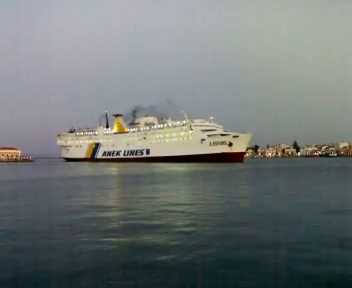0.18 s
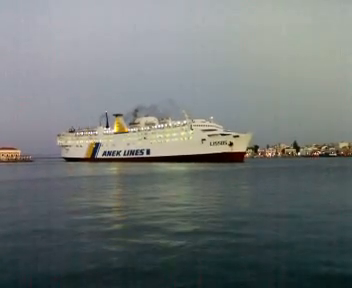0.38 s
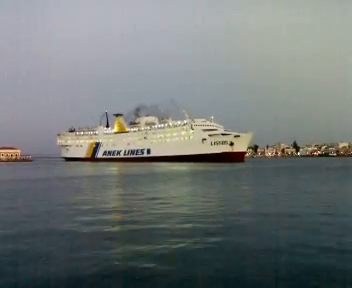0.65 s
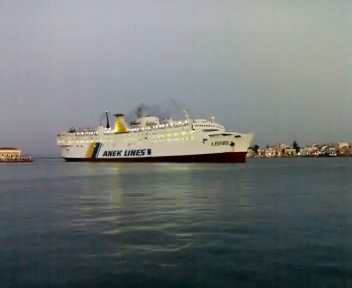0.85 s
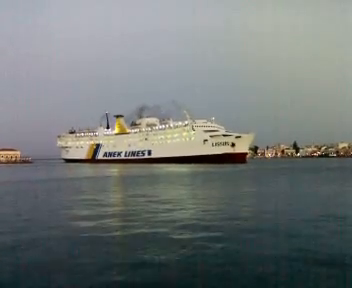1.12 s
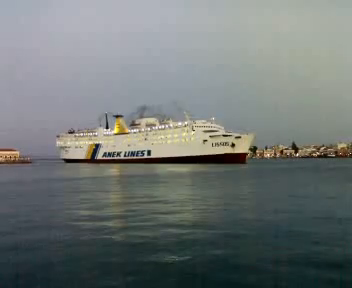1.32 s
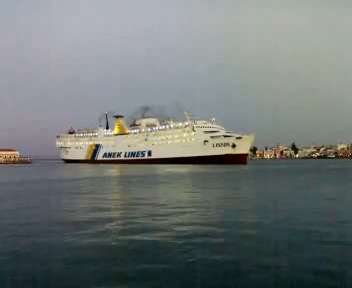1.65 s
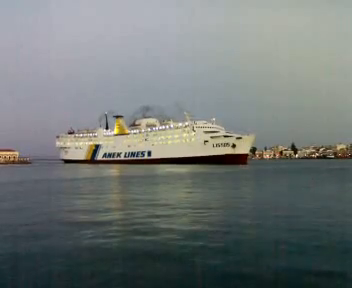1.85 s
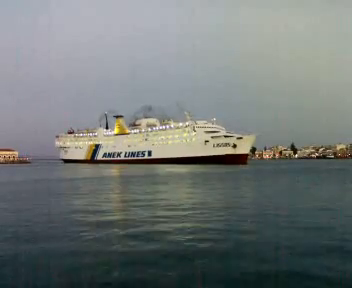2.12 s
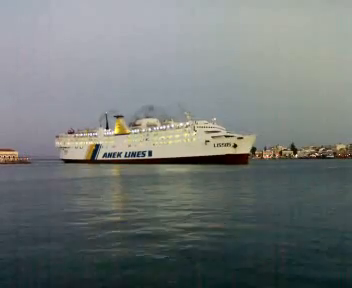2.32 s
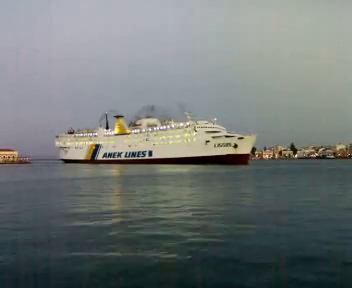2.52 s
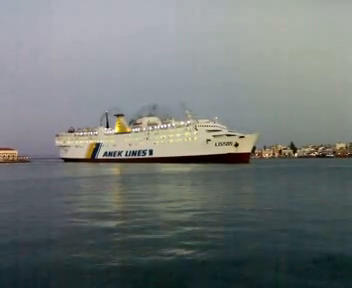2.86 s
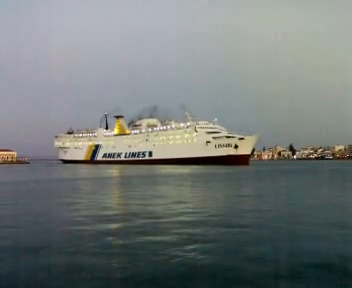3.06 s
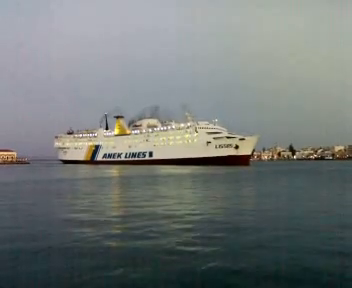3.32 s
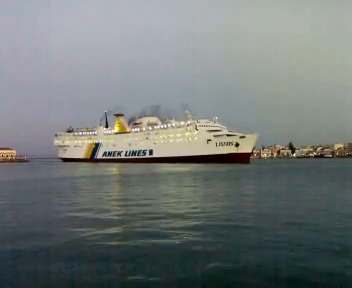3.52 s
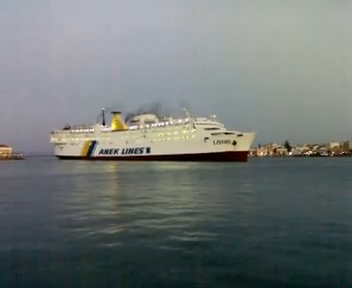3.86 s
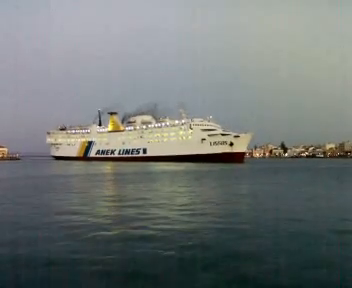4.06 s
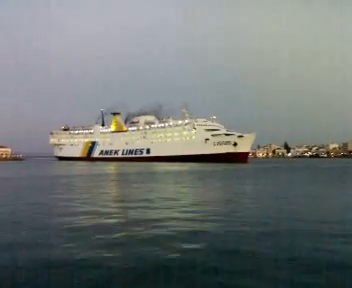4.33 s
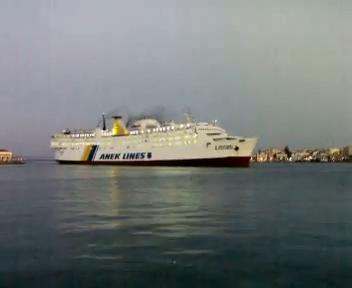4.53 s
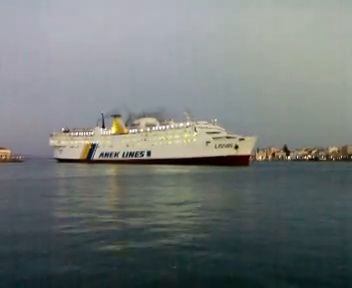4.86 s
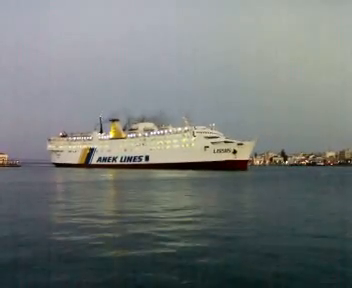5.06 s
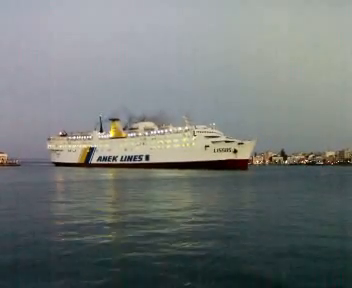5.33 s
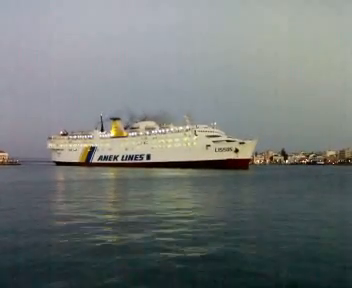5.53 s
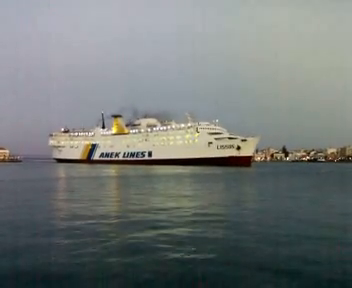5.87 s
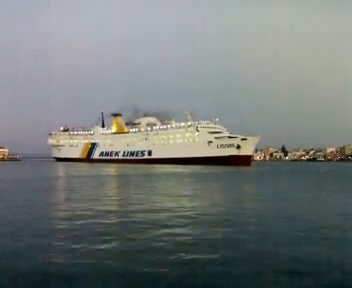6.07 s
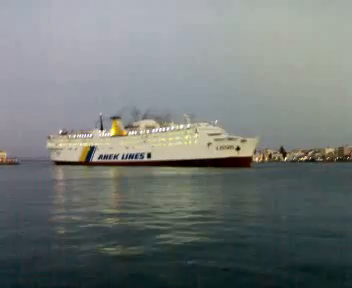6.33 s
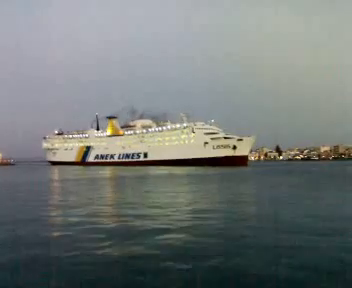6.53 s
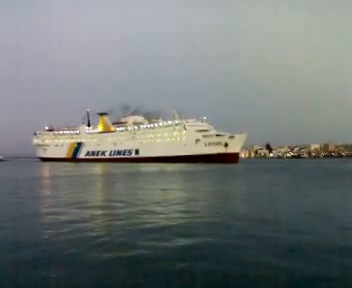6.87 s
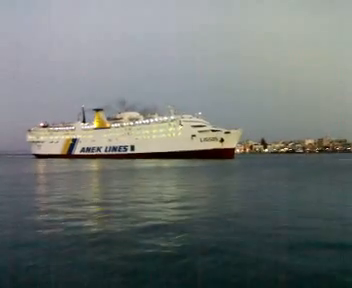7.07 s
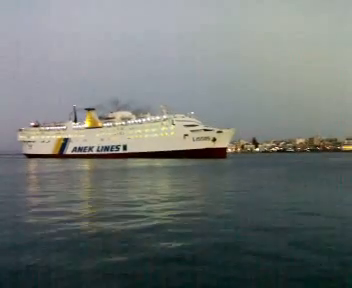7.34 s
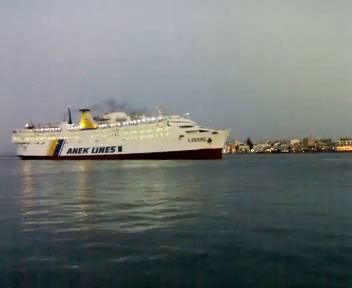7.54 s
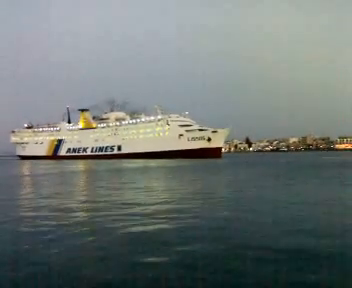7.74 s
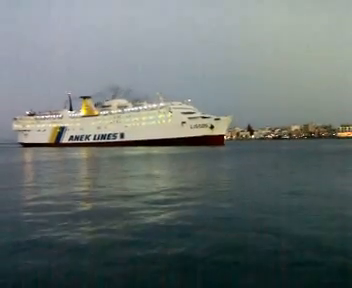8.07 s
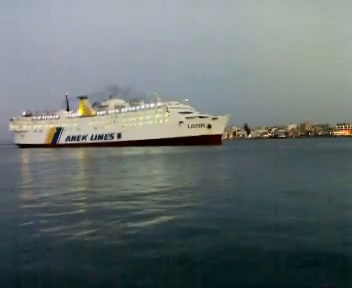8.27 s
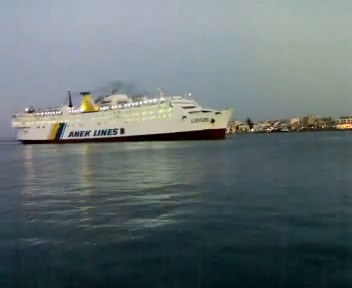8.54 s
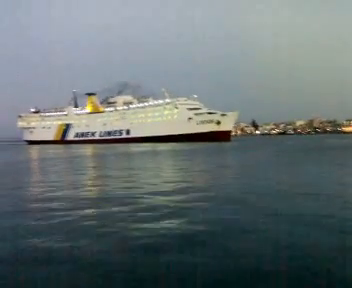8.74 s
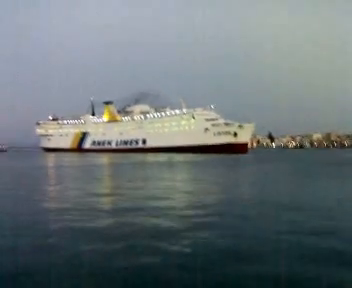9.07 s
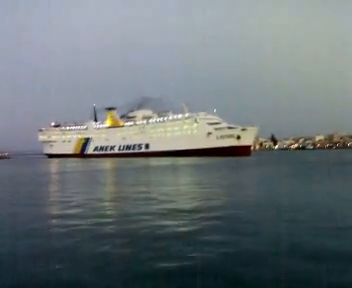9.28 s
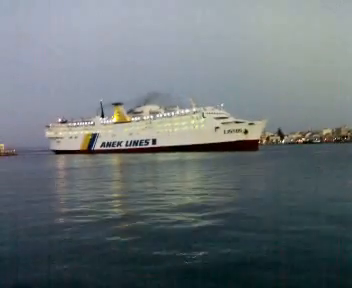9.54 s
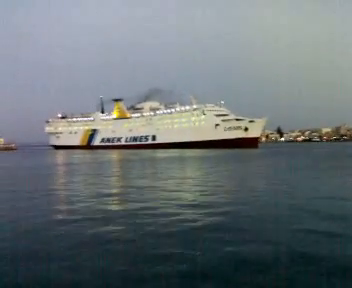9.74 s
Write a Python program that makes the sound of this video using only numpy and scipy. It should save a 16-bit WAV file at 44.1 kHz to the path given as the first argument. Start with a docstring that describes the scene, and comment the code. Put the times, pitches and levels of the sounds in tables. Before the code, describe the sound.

Steady ship engine rumble and ventilation roar across the water, with a swelling thruster whine, churning wash and light wind on the microphone.

```python
"""A large ferry's main diesel drones as it manoeuvres in a harbour, heard from the quay on a small camera.
Two generators throb, a blower hums and fans roar over the exhaust. As the propellers take load
the water hisses, a thruster whines in two pushes and turbochargers whistle.
Small birds chirp briefly, a breeze buffets the microphone, and there are a few close ticks and knocks;
the camera's electronics whine faintly."""
import sys
import numpy as np
from scipy import signal
from scipy.fft import rfft, irfft
from scipy.io import wavfile
from scipy.ndimage import map_coordinates

SR = 44100
rng = np.random.default_rng(int(sys.argv[2]) if len(sys.argv) > 2 else 0)


def persist_wave(psi):
    """Save psi, clipped to +-1, as 16-bit WAV."""
    counts = np.round(np.clip(psi, -1, 1) * 32767).astype(np.int16)
    wavfile.write(sys.argv[1], SR, np.atleast_2d(counts).T)


N = 436590
TIME = np.arange(N) / SR
FREQ = np.maximum(np.arange(N // 2 + 1) * SR / N, 1)

# diesel exhaust spectrum (frequency [Hz], relative level [dB])
EXHAUST_SPECTRUM = [(12, -22), (25, -8.5), (42, -7), (62, -6.5), (88, -10), (120, -1.8), (150, -0.8),
                    (215, -1), (280, -6.3), (380, -9.5), (480, -12.5), (600, -21.5), (1000, -37.5)]
# thruster pushes (time [s], length [s], gear level [dB])
PUSHES = [(3.06, 0.7, -39.7), (4.05, 0.9, -38)]


def undb(db):
    """Decibels to gain."""
    return 10 ** (np.asarray(db) / 20)


def unit(x):
    """Scale to rms 1."""
    return x / np.sqrt(np.mean(x ** 2))


def noise():
    """White noise."""
    return rng.standard_normal(N)


def walk(rate_hz):
    """Smooth random drift, spread about 1."""
    points = rng.standard_normal(2048)
    return map_coordinates(points, [TIME[::32] * rate_hz], order=3, mode="wrap").repeat(32)[:N]


def add(out, start_s, sound):
    """Mix in a short sound."""
    i = int(start_s * SR)
    out[i:i + len(sound)] += sound[:max(N - i, 0)]


def curve(table, column):
    """Column of a timed table, linearly interpolated."""
    rows = np.array(table)
    return np.interp(TIME, rows[:, 0], rows[:, column])


def plateau(full_s, off_s, rise_db_per_s, fall_db_per_s):
    """Attack, hold and release in dB; 0 during the hold."""
    return -rise_db_per_s * np.maximum(full_s - TIME, 0) - fall_db_per_s * np.maximum(TIME - off_s, 0)


def swell(at_s, length_s):
    """Gaussian bell of gain, peak 1."""
    return np.exp(-(2 * (TIME - at_s) / length_s) ** 2)


def power_sum(*gains):
    """Joint gain of uncorrelated parts."""
    return np.sqrt(sum(gain ** 2 for gain in gains))


def colour(x, spectrum):
    """Filter by (Hz, dB) points, rolling off beyond both ends; rms 1."""
    hz, db = np.transpose(spectrum)
    rolloff = np.minimum(FREQ / hz[0], 1) ** 2 * np.minimum(hz[-1] / FREQ, 1) ** 2
    gain = undb(np.interp(np.log(FREQ), np.log(hz), db))
    return unit(irfft(rfft(x) * rolloff * gain, N))


def ring(x, hz, width_hz):
    """Resonance applied twice for steep skirts; rms 1."""
    detuning = (FREQ / hz - hz / FREQ) * hz / width_hz / np.sqrt(2)
    return unit(irfft(rfft(x) / (1 + 1j * detuning) ** 2, N))


def rush(at_s, length_s, hz, width_hz, db):
    """Band of turbulence that swells and fades once."""
    return undb(db) * ring(noise(), hz, width_hz) * swell(at_s, length_s)


def tone(hz, partials):
    """Partials (ratio, width [Hz], level [dB], steady share), each part steady, part turbulent."""
    phase = 2 * np.pi * np.cumsum(hz * np.ones(N)) / SR
    out = 0
    for ratio, width_hz, db, steady in partials:
        smear = walk(width_hz) + 1j * walk(width_hz)
        amplitude = np.sqrt(2 * steady) + np.sqrt(1 - steady) * smear
        out += undb(db) * np.real(amplitude * np.exp(1j * ratio * phase))
    return out


def drone(hz, orders, wander=.0006, fade_db=1.1, fade_hz=1.6):
    """Machine lines (order, level [dB]) fading on their paths over the water; returns sound, phase."""
    phase = 2 * np.pi * np.cumsum(hz * (1 + wander * walk(1.998))) / SR
    out = 0
    for order, db in orders:
        gain = undb(db + fade_db * walk(fade_hz))
        out += gain * np.sin(order * phase + 2 * np.pi * rng.random())
    return np.sqrt(2) * out, phase


def electronics():
    """Faint steady whine of the camera."""
    # (frequency [Hz], rms level [dB])
    lines = [(4980.5, -67.5), (5273.4, -73), (5566.4, -68), (5859.4, -68), (6152.4, -70.5)]
    return np.sqrt(2) * sum(undb(db) * np.sin(2 * np.pi * hz * TIME) for hz, db in lines)


def ticks(decay_s=0.0022):
    """Dry ticks, as of fingers on the camera's case."""
    # (time [s], centre [Hz], width [Hz], onset level [dB])
    taps = [(1.795, 6500, 2000, -43), (5.474, 5900, 1200, -45), (8.761, 3400, 1500, -41),
            (8.813, 4100, 900, -46), (8.885, 6700, 1200, -44), (8.9015, 2500, 2200, -28.5),
            (8.922, 3900, 2000, -40.5), (9.087, 3900, 1200, -44), (9.132, 6400, 1500, -44),
            (9.137, 6300, 1500, -49)]
    out, t = np.zeros(N), TIME[:SR // 20]
    for at_s, hz, width_hz, db in taps:
        band = signal.butter(2, [hz - width_hz / 2, hz + width_hz / 2], "band", fs=SR, output="sos")
        burst = unit(signal.sosfilt(band, rng.standard_normal(len(t))))
        add(out, at_s, undb(db) * burst * np.exp(-t / decay_s))
    return out


def knocks():
    """Soft thumps on the microphone, one to a few cycles each."""
    # (time [s], frequency [Hz], length [s], envelope peak [dB])
    thumps = [(8.296, 95, .011, -12.5), (8.306, 260, .011, -15), (8.5967, 470, .002, -7.5),
              (8.607, 155, .03, -17)]
    return -sum(undb(db) * np.sin(2 * np.pi * hz * (TIME - at_s)) * swell(at_s, length_s)
                for at_s, hz, length_s, db in thumps)


def breeze(lull_db=-34, gust_db=-32):
    """Low turbulence at the microphone: a lull, one long gust, a few stronger eddies."""
    # eddies (time [s], length [s], centre [Hz], level [dB])
    buffets = [(6.984, 0.06, 90, -22), (7.103, 0.05, 95, -22), (7.487, 0.13, 105, -27),
               (8.138, 0.15, 80, -24), (8.35, 0.04, 188, -27), (8.778, 0.085, 90, -25)]
    gust = undb(gust_db + plateau(full_s=6, off_s=8.6, rise_db_per_s=9.5, fall_db_per_s=9.5))
    rumble = colour(noise(), [(8, -12), (32, -3), (55, 0.5), (100, -1), (200, -19)])
    rumble *= power_sum(undb(lull_db), gust) * undb(0.6 * walk(11))
    return rumble + sum(rush(at_s, length_s, hz, hz, db) for at_s, length_s, hz, db in buffets)


def birds(rasp=0.002):
    """Thin gliding chirps with a slight rasp."""
    # (time [s], length [s], start [Hz], middle [Hz], end [Hz], level [dB])
    chirps = [(5.61, .08, 5880, 6020, 6080, -57), (5.68, .1, 6180, 6200, 6250, -62),
              (6.18, .16, 5820, 6030, 5700, -56), (6.33, .09, 6080, 6070, 6140, -55),
              (6.39, .12, 5400, 5740, 5740, -60), (6.775, .05, 5300, 5750, 6080, -57),
              (6.8, .09, 6300, 6390, 6370, -60), (6.85, .11, 6050, 6100, 6160, -56),
              (6.96, .14, 4160, 4200, 4160, -53), (7.1, .08, 5600, 5800, 5820, -62.5),
              (7.16, .13, 4220, 4200, 4170, -60)]
    out, waver = np.zeros(N), 1 + rasp * walk(210)
    for at_s, length_s, first_hz, middle_hz, last_hz, db in chirps:
        progress = np.linspace(0, 1, int(length_s * SR))
        arch = np.polyfit([0, .5, 1], [first_hz, middle_hz, last_hz], 2)
        hz = np.polyval(arch, progress) * waver[int(at_s * SR):][:len(progress)]
        envelope = undb(db) * np.sqrt(2) * np.sin(np.pi * progress)
        add(out, at_s, envelope * np.sin(2 * np.pi * np.cumsum(hz) / SR))
    return out


def fans(level_db=-35, growth_db=5, turn_s=(7.4, 9.55)):
    """Engine-room ventilation: the roar grows and changes colour as the ship turns."""
    # spectra before and after the turn (frequency [Hz], relative level [dB])
    spectrum_before = [(270, -6.5), (328, 6.5), (410, -8), (610, -5.5), (730, 1), (900, -0.5), (1200, -1),
                       (1380, 1), (1560, -2.5), (1800, -4.5), (2050, -3.5), (2500, -12), (3000, -21),
                       (3600, -32.5), (4700, -27), (5400, -34), (7000, -43)]
    spectrum_after = [(250, 5), (340, 9), (420, -3), (490, -2), (580, -5.5), (730, -1), (1200, -1),
                      (1560, 2.5), (1800, -2.5), (2100, -8.5), (2500, -11), (3000, -17.5), (3600, -26),
                      (4700, -30.5), (5400, -34), (7000, -39)]
    turned = np.interp(TIME, turn_s, [0, 1])
    before = colour(noise(), spectrum_before) * undb(level_db) * np.sqrt(1 - turned)
    after = colour(noise(), spectrum_after) * undb(level_db + growth_db) * np.sqrt(turned)
    return (before + after) * undb(0.26 * walk(14))


def auxiliaries(blade_hz=163.05):
    """A blower's blade tone and octave fade in and out over the hum of smaller machines."""
    # (time [s], blade tone [dB], octave [dB])
    blower_levels = [(0, -34.5, -49), (1.05, -32.5, -48), (1.8, -43, -44), (4.7, -43, -43), (5.6, -45, -49),
                     (7.4, -46, -50), (8.7, -44, -41), (9.9, -38, -44)]
    # (frequency [Hz], start level [dB], end level [dB])
    hums = [(148.3, -42, -42), (296.6, -52, -52)]
    blower, _ = drone(blade_hz, [(1, curve(blower_levels, 1)), (2, curve(blower_levels, 2))])
    return blower + sum(drone(hz, [(1, np.linspace(start_db, end_db, N))])[0]
                        for hz, start_db, end_db in hums)


def water(load_db, wash_db=-32.5, spray_db=-43, burst_db=-42, wash_share=0.82, over_gear_db=4):
    """Propeller wash with finer spray above; both follow the load and surge with the thruster."""
    # spectra (frequency [Hz], relative level [dB])
    wash_spectrum = [(300, -15.5), (480, -4.5), (590, -3), (700, 4.5), (850, 1.5), (1050, 0), (1230, -6),
                     (1360, 0.5), (1560, 1), (1780, 0.5), (2100, -6.5), (2450, -12.5), (3700, -24.5),
                     (7000, -45)]
    spray_spectrum = [(1000, -6), (2000, 2.5), (2500, 2), (3000, -2), (3400, -7.5), (4100, -10),
                      (4800, -10), (5300, -17.5), (5700, -14.5), (6200, -13), (7000, -13.5), (7500, -30)]
    # water boiling up (time [s], length [s], centre [Hz], width [Hz], level [dB])
    surges = [(1.57, 0.25, 1930, 600, -41), (2.05, 1, 1660, 883, -41), (2.73, 0.17, 4160, 700, -52.5),
              (3.17, 0.94, 1530, 896, -36), (3.24, 0.5, 6330, 2630, -54), (4.32, 0.52, 1460, 860, -36)]
    pushes = [undb(db + over_gear_db) * swell(at_s, length_s) for at_s, length_s, db in PUSHES]
    # one burst of spray as the thruster bites
    burst = undb(burst_db + plateau(full_s=2.66, off_s=2.66, rise_db_per_s=71, fall_db_per_s=6.5))
    wash = colour(noise() * undb(walk(150)), wash_spectrum) * undb(0.29 * walk(9))
    wash *= power_sum(undb(wash_db + wash_share * load_db), *pushes)
    spray = colour(noise() * undb(1.2 * walk(190)), spray_spectrum) * undb(0.95 * walk(12))
    spray *= power_sum(undb(spray_db + load_db), burst)
    return wash + spray + sum(rush(*surge) for surge in surges)


def turbochargers(full_s=4.2, flare_width_hz=25, flare_steady=.7):
    """Thin whistles follow the boost, creep up in pitch and each swell once; two more flare briefly."""
    # (pitch at full_s [Hz], climb [Hz/s], width [Hz], level [dB], steady share [0-1],
    #  swell time [s], swell length [s], swell level [dB])
    whistles = [(2194, 3, 25, -48.5, .8, 5.98, .75, -43), (3000, 12, 70, -55, .25, 5.95, .4, -57),
                (4520, 8, 40, -67.5, .8, 5.77, .45, -56)]
    # (time [s], length [s], pitch [Hz], level [dB])
    flares = [(3.17, .2, 1358, -36), (6.62, .36, 2224, -43)]
    boost = undb(plateau(full_s, off_s=6.65, rise_db_per_s=7.5, fall_db_per_s=38.5))
    out = sum(tone(hz, [(1, flare_width_hz, db, flare_steady)]) * swell(at_s, length_s)
              for at_s, length_s, hz, db in flares)
    for hz, climb_hz_per_s, width_hz, db, steady, at_s, length_s, swell_db in whistles:
        gain = power_sum(undb(db) * boost, undb(swell_db) * swell(at_s, length_s))
        out += gain * tone(hz + climb_hz_per_s * (TIME - full_s), [(1, width_hz, 0, steady)])
    return out


def thruster(load_db, gear_hz=442, gear_db=-50, howl_hz=683, howl_db=-37.3):
    """The gear spins up, whining faintly under load and loudly at each push; the tunnel howls."""
    # gear and tunnel partials (pitch ratio, width [Hz], relative level [dB], steady share [0-1])
    gear_partials = [(.5, 8, -1, .8), (1, 12, 0, .88), (1.76, 25, -8, .4), (2, 40, -7, .3),
                     (2.19, 30, -4, .4), (2.58, 30, -5, .45), (2.97, 45, -4, .35), (3.9, 120, -6, 0)]
    howl_partials = [(.97, 22, -6, .4), (1, 24, 0, .62), (1.03, 30, -6.5, .25)]
    spun_up_s, climb_hz_per_s, howl_waver = 3.8, 6, .007
    howl = tone(howl_hz * (1 + howl_waver * walk(4)), howl_partials)
    howl *= undb(howl_db + plateau(full_s=2.97, off_s=4.05, rise_db_per_s=35, fall_db_per_s=14))
    gear = tone(gear_hz - climb_hz_per_s * np.maximum(spun_up_s - TIME, 0), gear_partials)
    pushes = [undb(db) * swell(at_s, length_s) for at_s, length_s, db in PUSHES]
    return howl + gear * power_sum(undb(gear_db + load_db), *pushes)


def generator(cycle_hz, orders, comb_db, wander=.0005):
    """Unequal cylinders repeat a pattern each working cycle: a throbbing comb, a few lines strong."""
    size = 4096  # samples per cycle
    multiples = np.arange(size // 2 + 1)
    hz, db = np.transpose(EXHAUST_SPECTRUM)
    lines_db = comb_db + np.interp(multiples * cycle_hz, hz, db, left=-np.inf, right=-np.inf)
    phases = np.exp(2j * np.pi * rng.random(len(multiples)))
    crank = np.cumsum(cycle_hz * (1 + wander * walk(2))) / SR % 1 * size
    strong, start_db, end_db = np.transpose(orders)
    sounds = []
    for strong_db in (start_db, end_db):
        lines_db[strong.astype(int)] = strong_db
        cycle = irfft(undb(lines_db) * phases) * size / np.sqrt(2)
        sounds.append(np.interp(crank, np.arange(size + 1), np.append(cycle, cycle[0])))
    start, end = sounds
    return start + (end - start) * TIME / TIME[-1]


def generators():
    """Two governed four-strokes beat against each other; their lines shift in level as the ship turns."""
    # strong exhaust lines (multiple of the cycle rate, start level [dB], end level [dB])
    first_orders = [(8, -47, -45), (10, -42, -39), (16, -48, -45), (17, -43, -38), (23, -48, -44),
                    (24, -48, -41), (26, -45, -43), (28, -48, -48), (33, -47, -45), (36, -47, -50),
                    (44, -50, -46), (59, -55, -48)]
    second_orders = [(5, -46, -45), (12, -38, -37), (18, -46, -47), (35, -47, -50), (37, -50, -51),
                     (49, -52, -50)]
    first = generator(cycle_hz=6.038, orders=first_orders, comb_db=-51)
    second = generator(cycle_hz=6.238, orders=second_orders, comb_db=-54)
    return first + second


def main_diesel(load_db, octave_cap_db=-39.5, gas_db=-29.3, puff_depth=0.19, gas_share=0.26):
    """The engine drones, slowly speeding up; exhaust gas puffs at each firing and grows with load."""
    # (time [s], firing rate [Hz], level [dB])
    firing = [(0, 63.3, -46), (1.25, 64.6, -39), (2.1, 67.3, -43), (3.5, 68.6, -39), (4.25, 69.1, -33.5),
              (5.0, 69.6, -33), (5.8, 69.6, -40), (6.5, 70, -46), (9.9, 71, -44)]
    firing_db = curve(firing, 2)
    octave_db = np.minimum(firing_db - 0.5, octave_cap_db)
    engine, phase = drone(curve(firing, 1), [(1, firing_db), (2, octave_db)])
    gas = colour(noise() * (1 + puff_depth * np.cos(phase)), EXHAUST_SPECTRUM)
    return engine + gas * undb(gas_db + gas_share * load_db)


def scene():
    """Ship, harbour and microphone in mono; the propellers take load, hold it and ease off."""
    load_db = plateau(full_s=2.86, off_s=6.29, rise_db_per_s=1.5, fall_db_per_s=4)
    machinery = main_diesel(load_db) + generators() + auxiliaries() + fans()
    manoeuvre = thruster(load_db) + turbochargers() + water(load_db)
    return (machinery + manoeuvre + birds() + ticks() + breeze() + knocks() + electronics())[None]


def record(dry):
    """The camera cuts the treble steeply."""
    cutoff_hz = 7400
    return signal.sosfilt(signal.ellip(10, .2, 80, cutoff_hz, fs=SR, output="sos"), dry)


dry = scene()
out = record(dry)
persist_wave(out)
```